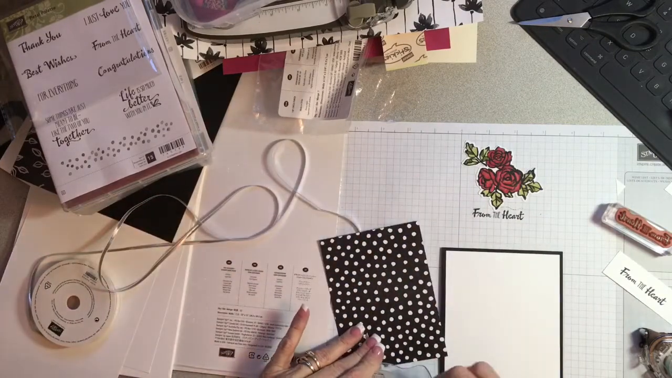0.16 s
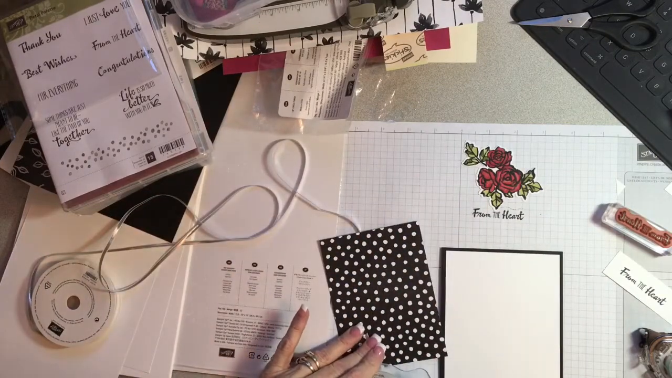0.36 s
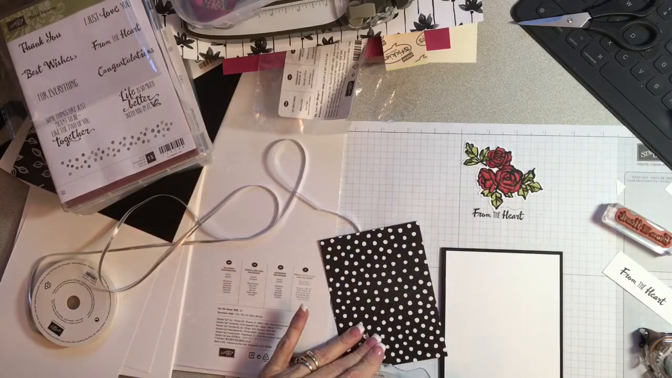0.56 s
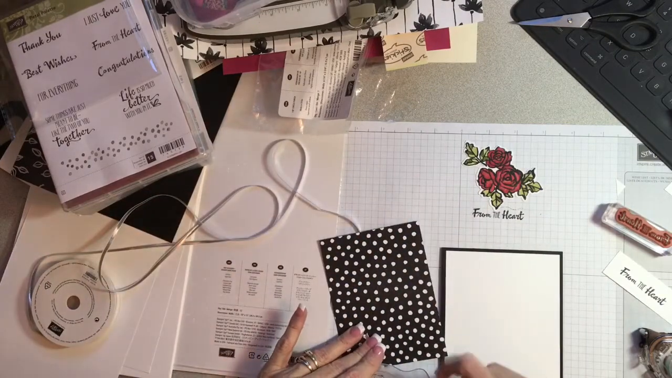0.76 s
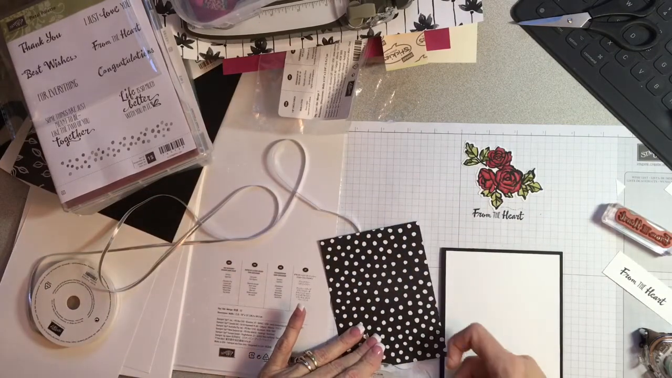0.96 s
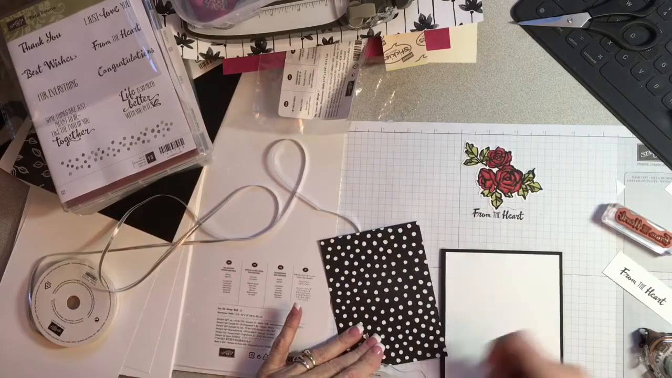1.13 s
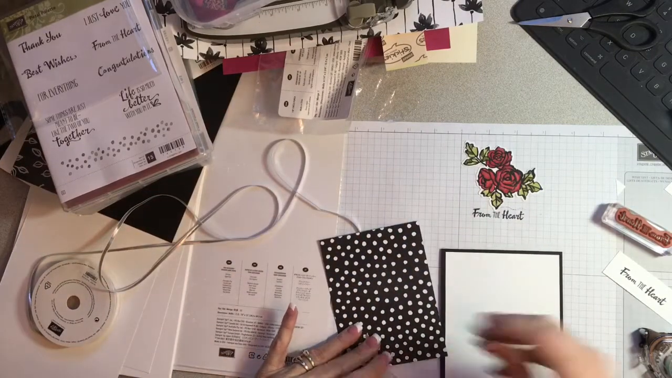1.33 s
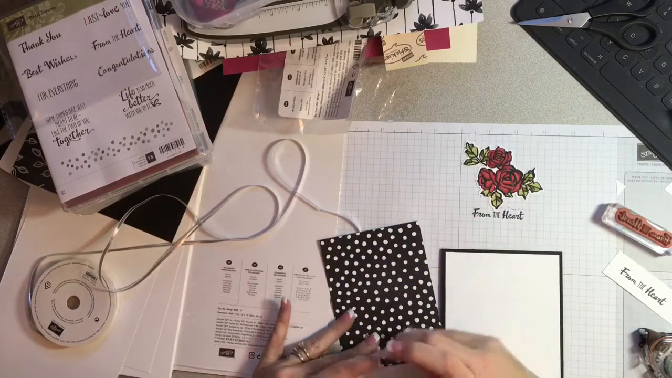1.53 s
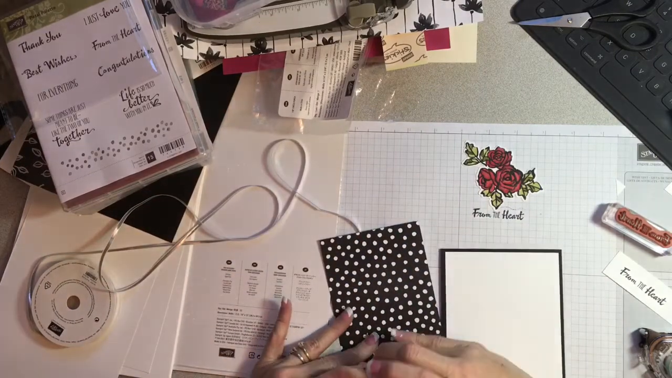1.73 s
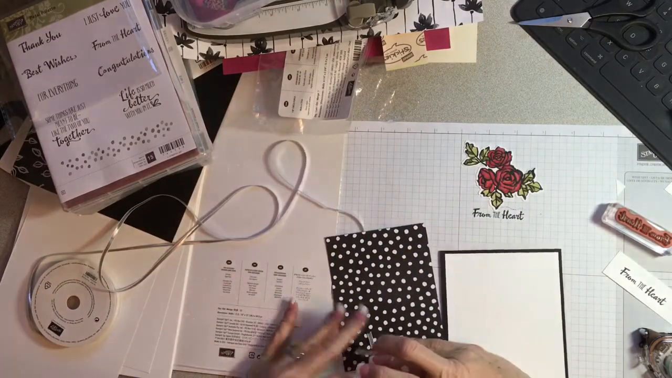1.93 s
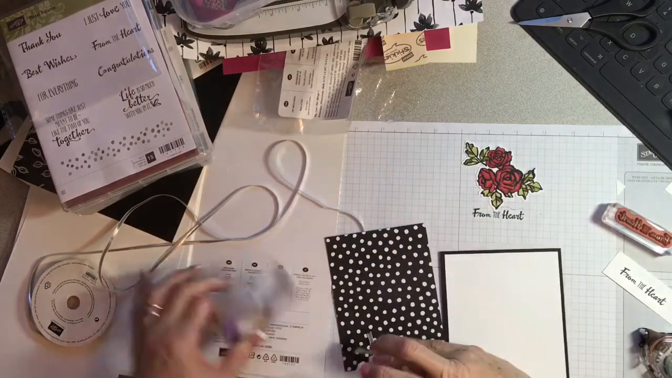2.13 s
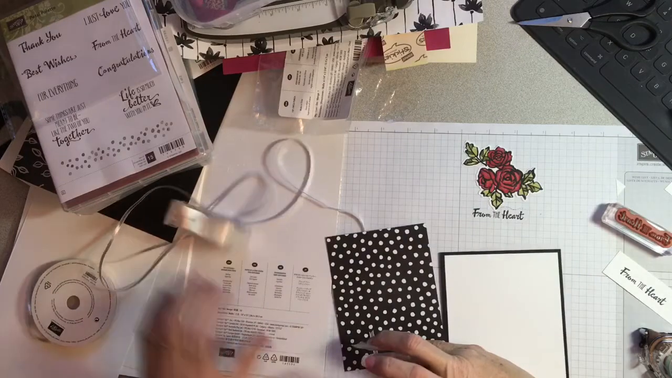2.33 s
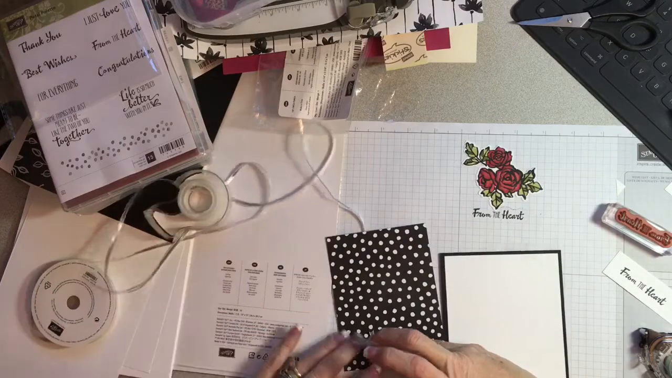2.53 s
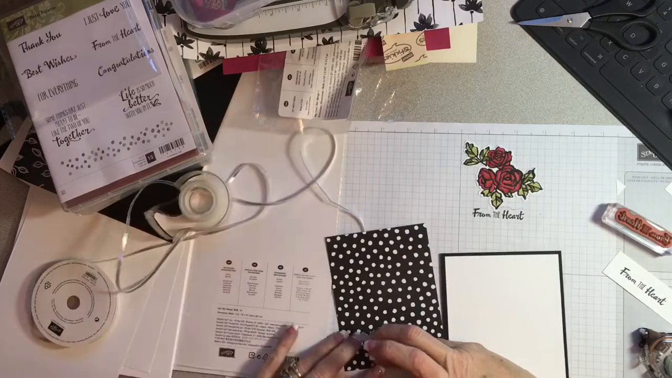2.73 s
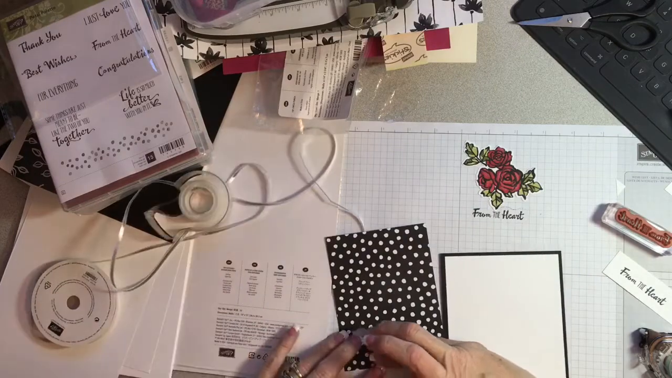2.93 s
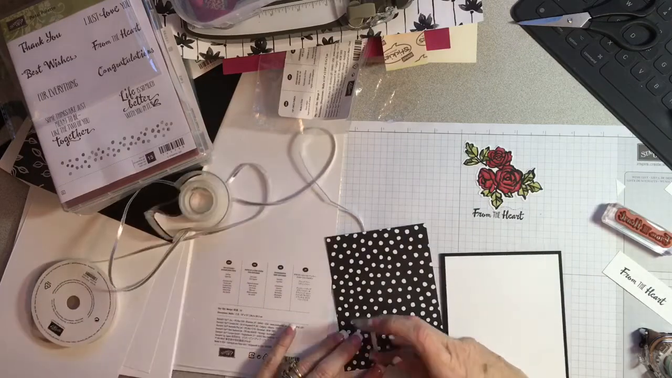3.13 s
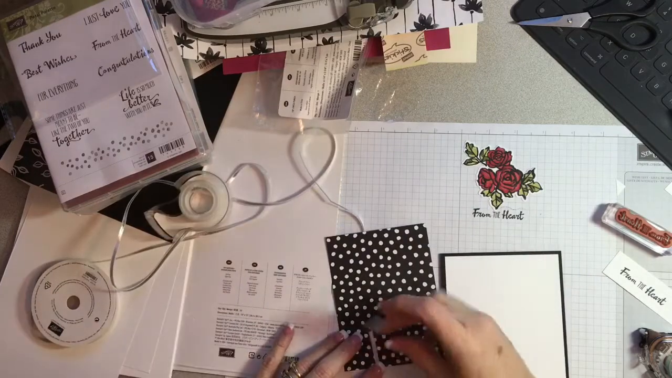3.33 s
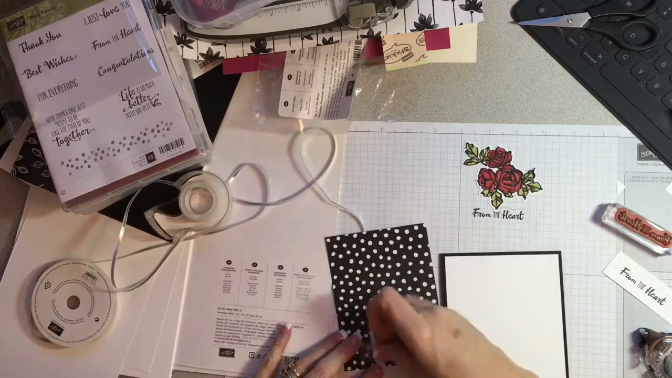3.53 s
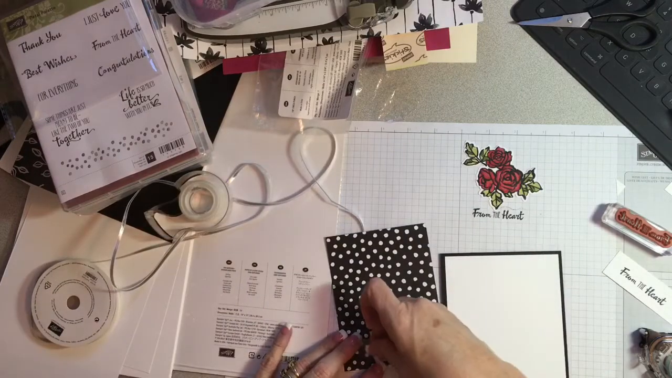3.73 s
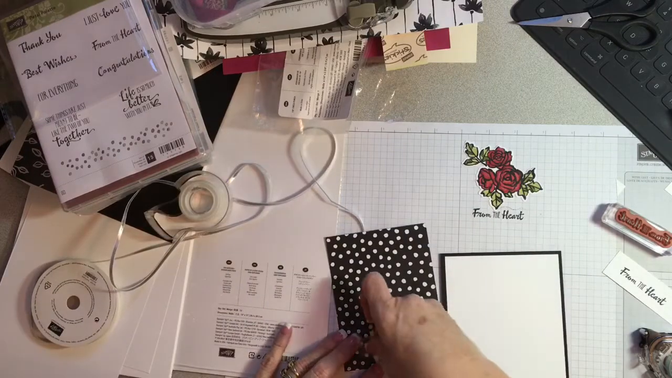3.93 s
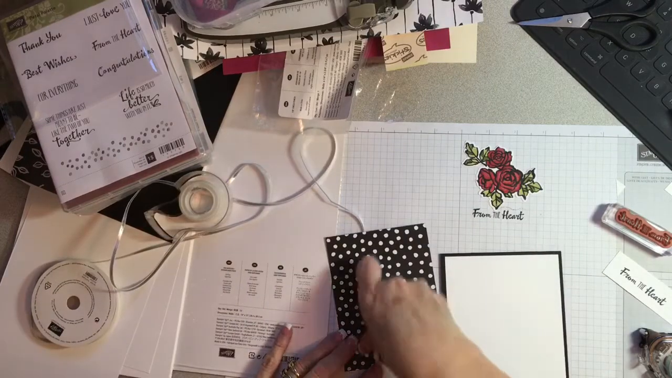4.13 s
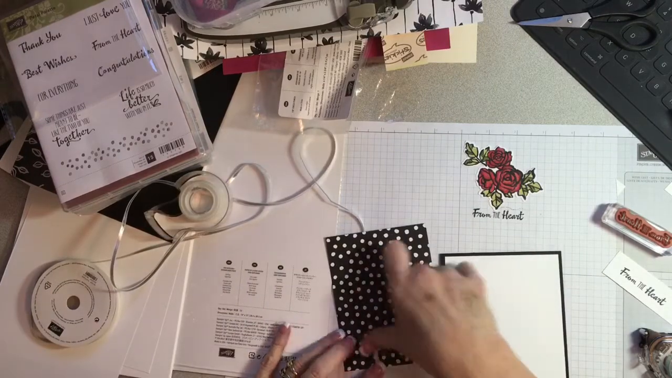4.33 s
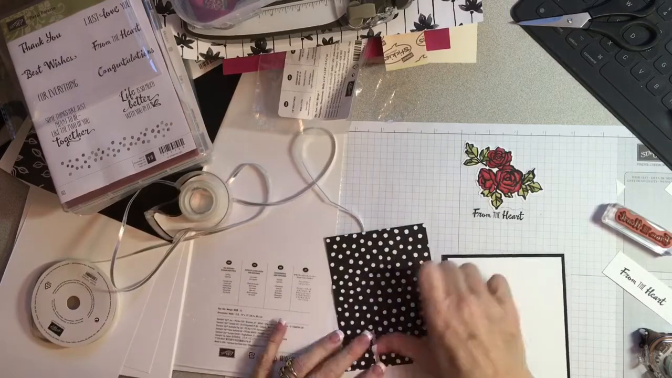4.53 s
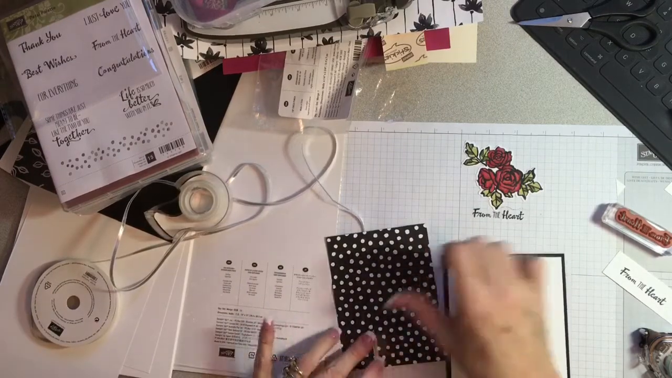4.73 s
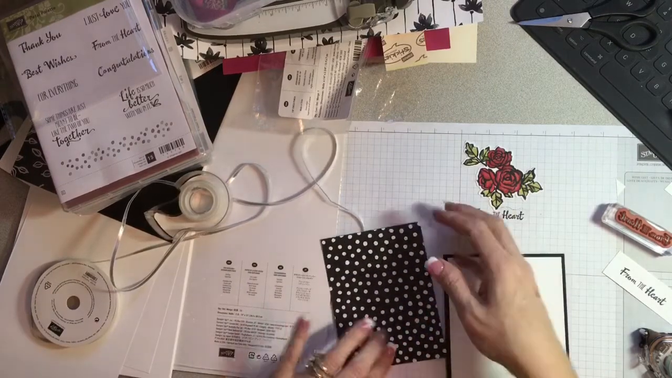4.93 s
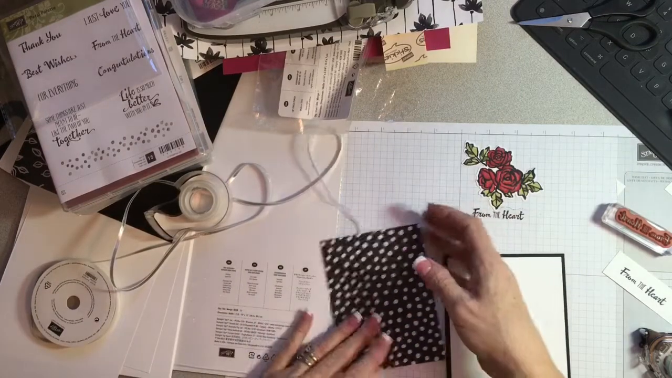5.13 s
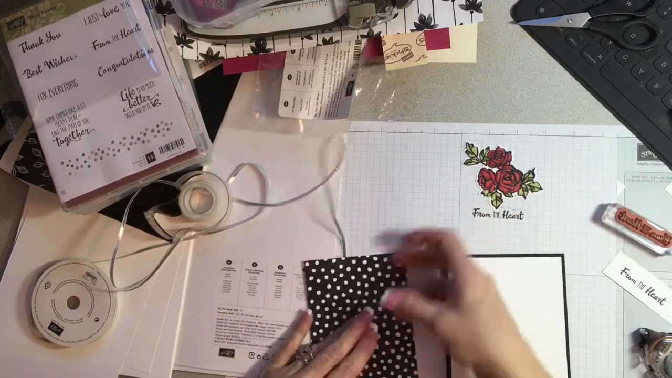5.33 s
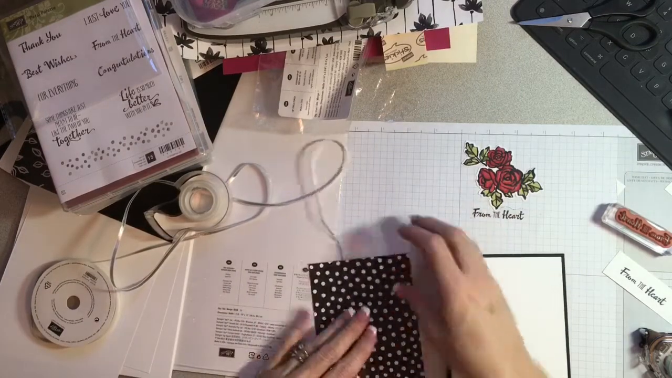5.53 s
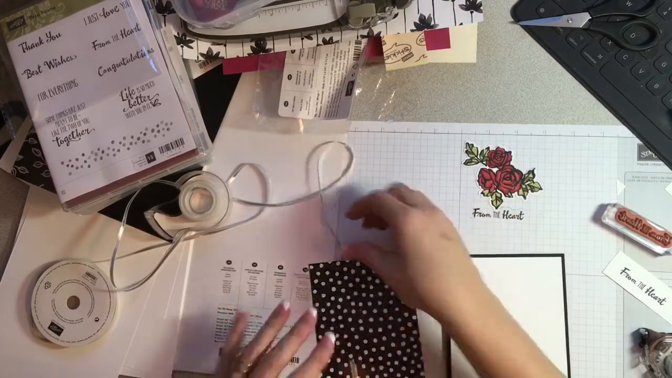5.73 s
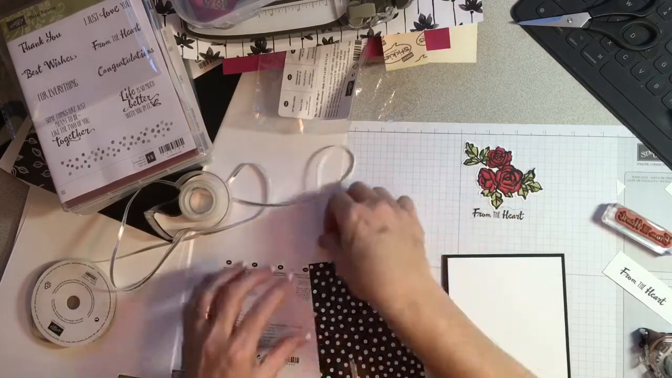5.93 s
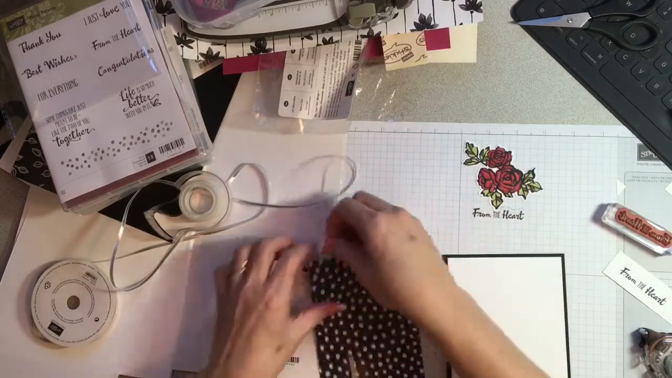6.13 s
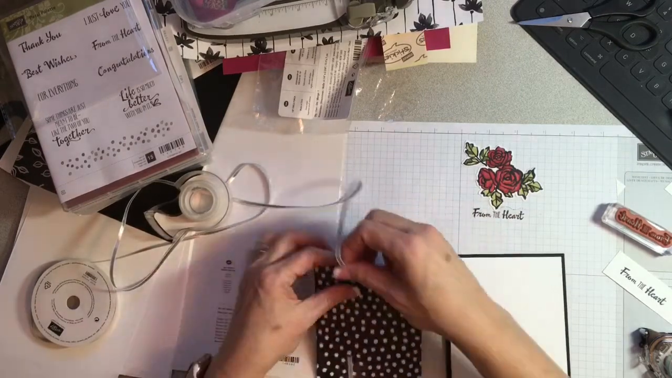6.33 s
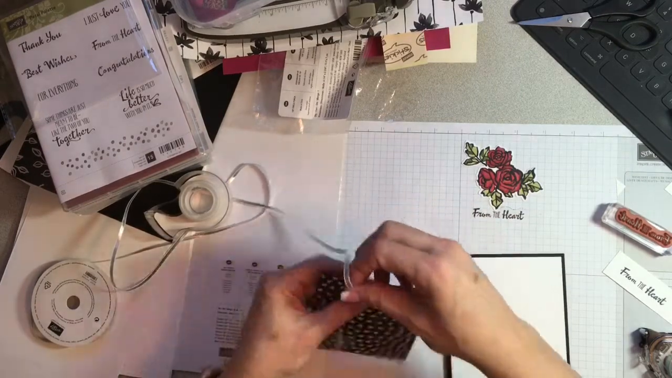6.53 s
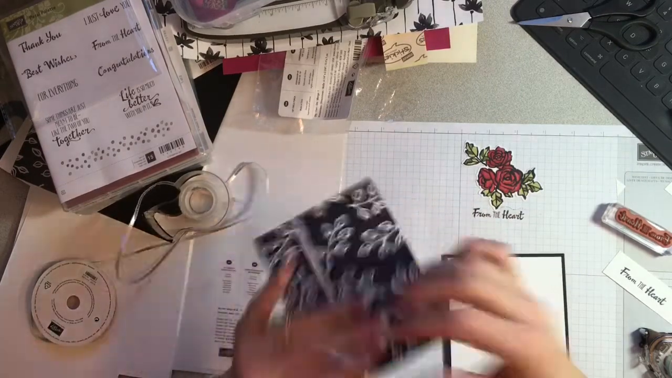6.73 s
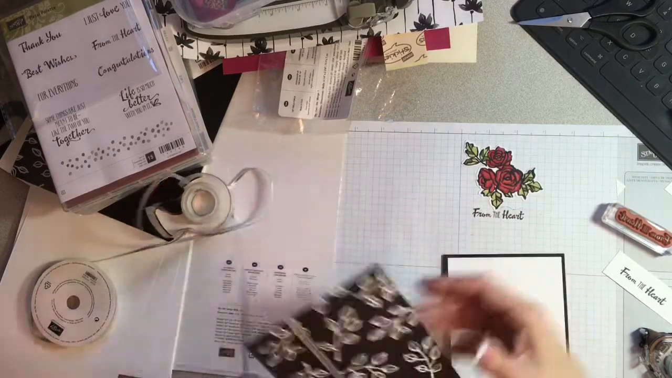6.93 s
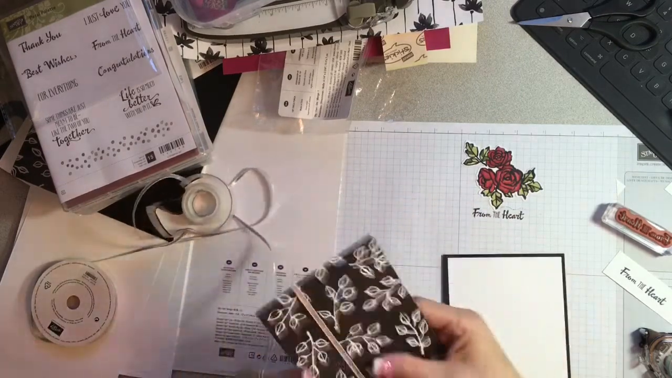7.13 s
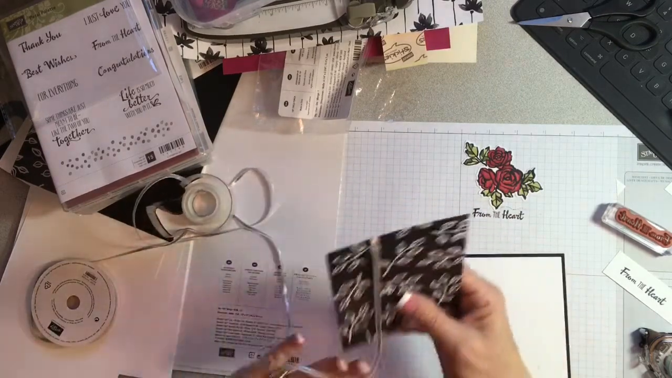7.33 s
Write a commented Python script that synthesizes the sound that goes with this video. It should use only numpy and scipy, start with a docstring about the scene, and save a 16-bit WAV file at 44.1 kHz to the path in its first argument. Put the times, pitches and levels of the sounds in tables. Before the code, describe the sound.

Close-up craft desk sounds: crisp tape cracks, a hollow plastic rattle and knock, soft finger rubs, small desk thumps and a bright card swish.

```python
"""A craft desk in a quiet room, with hands at work: tape snaps off a roll, the plastic dispenser
clatters down, fingers press tape flat and slide and flip stiff card. Strokes are shaped hiss, snaps are
showers of noise grains, knocks add ringing shell modes, and presses boom through decaying desk modes.
A small room answers all but the desk boom and the room tone; close pickup and desk reflection
colour the whole, with dips near 5, 7.8 and 10.4 kHz."""
import sys
import numpy as np
from scipy import signal
from scipy.io import wavfile
from scipy.ndimage import uniform_filter1d

SR = 44100
rng = np.random.default_rng(int(sys.argv[2]) if len(sys.argv) > 2 else 0)


def dump(signal):
    """Clip the signal to [-1, 1] and save it as 16-bit WAV at the path in sys.argv[1]."""
    limited = np.clip(np.atleast_2d(signal).T, -1, 1)
    pcm = np.round(limited * 32767).astype(np.int16)
    wavfile.write(sys.argv[1], SR, pcm)


N = 329868


def gain_of(db):
    """Decibels to amplitude."""
    return 10 ** (np.asarray(db) / 20)


def evened(x):
    """Scales to rms 1."""
    return x / np.sqrt(np.mean(np.abs(x) ** 2) + 1e-20)


def read(points, hz):
    """Reads a spectrum on a log-frequency axis."""
    f, value = np.transpose(points)
    return np.interp(np.log(hz + 1), np.log(f + 1), value)


def curve(points, t):
    """Reads a breakpoint curve at times t."""
    return np.interp(t, *np.transpose(points))


def add(mix, s, sound):
    """Adds a sound at time s."""
    part = mix[round(s * SR):][:len(sound)]
    part += sound[:len(part)]


def band(x, lo_hz, hi_hz):
    """Causal band-pass."""
    sos = signal.butter(2, [lo_hz, min(hi_hz, 20000)], "band", fs=SR, output="sos")
    return signal.sosfilt(sos, x)


def noise(field_db, size=256):
    """Noise whose short-time level follows field_db(hz column, time row)."""
    hop = size // 4
    hz = np.fft.rfftfreq(size, 1 / SR)[:, None]
    t = np.arange(N // hop + 5) * hop / SR
    real, imag = rng.standard_normal((len(t), len(hz), 2)).T
    unit = .6 * np.sqrt(len(hz))  # a flat 0 dB field comes out near rms 1
    frames = (real + 1j * imag) * gain_of(field_db(hz, t)) / unit
    return signal.istft(frames, nperseg=size, noverlap=size - hop)[1][:N]


# Room tone spectrum, lumpy in the lows: f/Hz, level/dB per Hz (shape only)
AIR_SPECTRUM = [(12, -29), (20, -3.5), (59, -9.5), (90, 1.5), (109, -19), (140, -0.5), (191, -4.5),
                (213, -7.5), (534, -14.5), (686, -18), (1100, -16.5), (1450, -17), (2680, -23),
                (3260, -35.5), (15500, -46)]
AIR_DB = -68.5  # rms level


def room_tone():
    """Steady air and electronics noise with a lumpy low end."""
    air = noise(lambda hz, t: read(AIR_SPECTRUM, hz) + 0 * t, size=2048)
    return gain_of(AIR_DB) * evened(air)


# Colour of rubbed surfaces before tilt: f/Hz, level/dB per Hz
RUB_COLOUR = [(1200, -17.5), (2500, -5), (3800, -4), (6500, -4.5), (10000, -7), (14000, 1)]
# Fingers, ribbon and card sliding, one row a stroke:
# peak t/s, length t/s, hiss level/dB, brightness/dB per octave, card body level/dB
STROKES = [(.0064, 0.031, -46.5, 11, -73), (0.055, 0.047, -30.5, 6.5, -59.5), (0.273, 0.075, -59, 11, -82),
           (0.35, .07, -52.5, 8, -83), (0.499, .15, -57, -1.5, -73), (0.583, 0.17, -54.5, 0, -68),
           (1.5, 0.13, -59.5, 6, -94), (1.738, 0.13, -63, -0.5, -85), (1.824, 0.11, -58, 8, -97),
           (1.905, 0.11, -55, 2.5, -91), (1.948, 0.058, -48, 5.5, -88), (3.215, .044, -55, 6, -86.5),
           (3.314, 0.075, -54.5, 3.5, -93), (3.349, 0.021, -54.5, 0, -90), (3.469, 0.062, -66, 10.5, -93),
           (3.691, 0.086, -71.5, -2, -93), (3.913, .09, -58, 4.5, -93), (4.172, 0.25, -49, 4, -91),
           (4.35, 0.07, -62, 6.5, -97), (4.429, 0.098, -56, 5, -93), (4.572, 0.054, -57.5, 0, -84),
           (4.696, 0.14, -58, 4, -86), (4.796, 0.024, -52.5, 5.5, -88), (4.905, 0.03, -38.5, 5.5, -84),
           (4.994, 0.031, -60, 3, -87), (5.075, 0.11, -51, 0.5, -70), (5.172, .2, -54, 1.5, -87),
           (5.244, 0.12, -47, 2, -89), (5.402, 0.019, -57.5, -0.5, -90), (5.518, 0.11, -50.5, 3, -95),
           (6.134, 0.2, -57, 2.5, -97), (6.216, 0.044, -53.5, -0.5, -70), (6.322, .11, -56.5, 1, -68),
           (6.4, 0.16, -54.5, 3, -68.5), (6.487, 0.07, -60, -1, -61.5), (6.556, 0.087, -47, 4, -77),
           (6.594, 0.062, -50, 1, -61.5), (6.708, 0.071, -46.5, 8, -63), (6.762, 0.075, -63, -3, -66.5),
           (6.83, 0.035, -33.5, 20, -71.5), (6.85, 0.13, -45.5, 10, -75), (6.958, 0.17, -60, 15, -94),
           (7.194, 0.068, -55.5, -6, -53.5), (7.269, 0.17, -54, -3, -72), (7.39, 0.25, -67, 0, -74)]
# Faint movement of sleeves and ribbon: t/s, level/dB added to the rub colour
RUSTLE_LEVEL = [(0.0, -57.5), (0.33, -69), (0.83, -62.5), (0.98, -55.5), (1.65, -68.5), (2.15, -63.5),
                (2.25, -57), (2.48, -65.5), (2.73, -70.5), (3.69, -73), (4.16, -69), (4.29, -68.5),
                (4.77, -70.5), (5.25, -70.5), (5.58, -69.5), (6.0, -73.5), (6.33, -59.5), (7.48, -71)]
# Wandering pitch of the card body: t/s, f/Hz
CARD_PITCH = [(0.0, 1360), (1.5, 1450), (1.9, 2400), (4.58, 2264), (4.69, 420), (5.08, 1380), (5.17, 845),
              (5.25, 2740), (6.21, 2560), (6.49, 1300), (6.77, 497), (6.83, 1250), (7.0, 1400), (7.19, 550),
              (7.27, 636), (7.39, 1980)]
SWELL_SHARE = 0.27  # part of a stroke spent swelling


def rubbing():
    """Sliding contact: grainy hiss, tilted for each stroke, over the duller body of the card."""
    peak, length, hiss_db, tilt_db, body_db = np.transpose(STROKES)
    swell, fade = SWELL_SHARE * length, (1 - SWELL_SHARE) * length
    body_hz = curve(CARD_PITCH, peak)

    def field_db(hz, t):
        """Level of strokes and rustle in each band and frame, roughened at random."""
        octaves = np.log2((hz + 300) / 7000)
        hiss = gain_of(read(RUB_COLOUR, hz) + tilt_db * octaves) ** 2
        body = gain_of(-16.5 * np.log2((hz + 30) / body_hz) ** 2) ** 2  # a broad hump
        hiss_power = gain_of(hiss_db) ** 2 * hiss / hiss.mean(0)
        body_power = gain_of(body_db) ** 2 * body / body.mean(0)

        since = t - peak[:, None]
        phase = np.clip(1 + np.minimum(since / swell[:, None], -since / fade[:, None]), 0, 1)
        strokes = (hiss_power + body_power) @ np.sin(np.pi / 2 * phase) ** 4
        rustle = gain_of(read(RUB_COLOUR, hz) + 0.51 * octaves + curve(RUSTLE_LEVEL, t)) ** 2

        patches = rng.standard_normal((len(t), len(hz))).T
        patches = uniform_filter1d(patches, size=6, axis=0)
        patches = evened(uniform_filter1d(patches, size=14, axis=1))
        # grit lifts or dips every band at once; sparse random lifts roughen the hiss
        grit = evened(uniform_filter1d(rng.standard_normal(len(t)), size=3))
        grains = rng.exponential(1, len(t)) * (rng.random(len(t)) < .07)
        roughness_db = 1.54 * patches + 1.8 * grit + 2.2 * np.minimum(grains, 3)
        return 10 * np.log10(strokes + rustle) + roughness_db

    return noise(field_db)


# Small room's decay by band: f/Hz, t60 t/s, level/dB (shape only)
ROOM_DECAY = [(203.4, 1, 1), (700, 0.33, -5), (2070, 0.17, 4.5), (5000, 0.21, -2), (12000, 0.13, 1)]
ROOM_DB = -9.5  # tail energy relative to the direct sound


def room(x):
    """Sparse taps of random sign, each band dying at its own speed."""
    taps = np.zeros(SR // 2)
    at = np.arange(120, len(taps) - 20, 20)
    taps[at + rng.integers(0, 20, len(at))] = rng.choice([-1., 1.], len(at))
    hz, t, frames = signal.stft(taps, SR, nperseg=256)
    decay = np.array(ROOM_DECAY)
    t60 = read(decay[:, [0, 1]], hz)[:, None]
    level_db = read(decay[:, [0, 2]], hz)[:, None]
    tail = signal.istft(frames * gain_of(level_db - 60 * t / t60), SR, nperseg=256)[1]
    return signal.oaconvolve(x, tail / np.linalg.norm(tail))[:N]


def crack(db, body_db, body_hz, edge_db, t60, rise, first_db):
    """One sharp break, then a shower of small ones, split into body, middle and edge bands."""
    t = np.arange(3500) / SR
    grain_db = 2.5 * np.minimum(rng.exponential(1, len(t)), 3)
    grit = rng.standard_normal(len(t)) * gain_of(grain_db)
    shower = grit * (1 - np.exp(-t / rise)) * gain_of(-60 * t / max(t60, .003))
    first_break = gain_of(first_db) * signal.unit_impulse(len(t), 8)
    burst = shower / np.linalg.norm(shower) + first_break

    body = band(burst, body_hz / 1.53, body_hz * 1.537)
    middle = band(burst, 2630, 7480)
    edge = band(band(burst, 12000, 18100), 7100, 19000)
    spread_db = 12.0  # energy of a burst over its peak
    return sum(gain_of(db + part_db + spread_db) * part / np.linalg.norm(part)
               for part_db, part in ((body_db, body), (0, middle), (edge_db, edge)))


# Tape and card snapping: t/s, middle-band peak level/dB (nominal), body f/Hz,
# body level/dB re middle, edge level/dB re middle
SNAPS = [(0.0586, -31, 910, -11.5, -9), (0.0714, -29.5, 2110, -6.5, -27), (0.149, -55, 1660, 3, 0),
         (0.1644, -39.5, 2300, -8, 7), (0.2018, -49, 1570, -20, 20), (0.2061, -34, 1740, -17, 15.5),
         (0.2162, -36.5, 1650, -4, -11), (0.271, -53.5, 2470, 1, 5), (0.358, -35, 1340, -2, 9),
         (0.387, -41.5, 2310, 2, 0), (0.4778, -41.5, 2250, -10, 1), (0.4856, -50, 2290, 8.5, -8),
         (0.583, -49, 2420, -17, 16), (0.6583, -59.5, 526, 12, -8), (0.6994, -47, 1700, 2.5, 12.5),
         (0.748, -44.5, 574, -10, -24), (0.8042, -38.5, 1410, -11, -3), (0.827, -15, 2100, -11, 5),
         (0.9717, -39, 2340, -25, 13), (0.9917, -51, 1810, 5, -14), (1.0051, -29.5, 2300, -4, 7),
         (1.018, -19.5, 2150, -3, 15), (1.0217, -26, 2000, -3, -20), (1.0255, -19, 2090, -2.5, 5.5),
         (1.035, -27, 2100, 6, 17), (1.1185, -33.5, 1300, 6, 10), (1.1572, -28, 1350, -6.5, -0.5),
         (1.3353, -45.5, 1490, 0.5, 2), (1.5168, -49, 1450, -2.5, -21), (3.3535, -42, 1350, -16.5, -7.5),
         (3.7663, -54.5, 530, -25, -8), (3.894, -58, 584, -11, 19), (3.911, -51, 503, -10, -14),
         (4.129, -42, 980, -17, 10), (4.1614, -36, 2300, -37, -10), (4.202, -44, 2280, -18, 0),
         (4.2217, -35.5, 2210, -21, 13), (4.2293, -27.5, 2300, -7, 13.5), (4.247, -41, 970, -5, -24),
         (4.411, -56, 2070, -16, 21.5), (4.464, -49, 608, -16, 3), (4.5244, -37, 1540, -4, 1),
         (4.9231, -29, 920, -12.5, 7.5), (5.0123, -49.5, 2400, -19, -6), (5.0396, -48, 2450, 1.5, -9),
         (5.0992, -32.5, 1460, -8.5, -10), (5.111, -40.5, 504, -7, 15), (5.319, -38.5, 2430, -10, -4),
         (5.3304, -29.5, 1360, -6.5, 3), (5.9595, -66.5, 1480, -11.5, 31.5), (6.0004, -45.5, 1230, 2, 0),
         (6.1987, -45, 2420, -19, -12), (6.5852, -53, 1280, 1, -15), (6.7084, -53.5, 900, 11, -5),
         (7.0244, -50.5, 1220, -8, -4), (7.17, -42.5, 525, -6, -4), (7.1935, -46.5, 650, 9.5, 5),
         (7.2133, -39.5, 1200, 0, 4), (7.2548, -50.5, 514, 12.5, 2), (7.2692, -43.5, 583, 5.5, -3)]
SNAP_T60_S = 0.037  # decay of the shower of small breaks


def snaps():
    """Glue letting go and card buckling: each release is a crack with its own body and edge."""
    out = np.zeros(N)
    for s, db, body_hz, body_db, edge_db in SNAPS:
        add(out, s, crack(db, body_db, body_hz, edge_db, SNAP_T60_S, rise=.0001, first_db=-1))
    return out


# Weight landing on the desk top: t/s, level/dB before the soft onset,
# hardness/dB (tilt per two octaves), slap level/dB re ring peak
THUMPS = [(0.062, -40, 2, -10.5), (0.352, -42, -11.5, -23), (0.826, -51, -13, 7), (1.027, -34.5, 2, -6),
          (1.152, -42.5, -4.5, -15.5), (2.241, -33, 0.5, -5.5), (2.568, -42.5, 3, 5.5),
          (4.13, -50, -20, -15), (4.226, -47.5, -12.5, -5), (4.524, -45, -7, -12), (4.682, -47, 3, -11.5),
          (4.92, -30.5, 4, -12), (5.096, -34.5, -6, -26), (5.114, -41, -11, -5), (5.327, -55.5, -11, -14),
          (6.588, -51, -1, -2), (7.184, -54, 1, 7.5), (7.261, -64, 0, 16)]
# Desk top modes: f/Hz, level/dB, t60 t/s
DESK_MODES = [(53.5, -5, 0.35), (85.7, -3, 0.34), (140.3, 2.5, 0.37), (233.2, 1.5, 0.18),
              (291, -8.5, 0.057), (399.3, -5, 0.17), (673, -16.5, .1)]


def desk():
    """A soft push rings the desk top; harder contact wakes its upper modes; a flat hand adds a slap."""
    out, t = np.zeros(N), np.arange(SR // 2) / SR
    onset = 1 - np.exp(-t / 0.0072)
    for s, db, hard_db, slap_db in THUMPS:
        spot_db = 1.5 * rng.standard_normal(len(DESK_MODES))  # mode balance varies with each landing
        ring = np.zeros(len(t))
        for (hz, mode_db, t60), offset_db in zip(DESK_MODES, spot_db):
            level_db = mode_db + offset_db + hard_db * np.log2(hz / 86) / 2
            ring += gain_of(level_db - 60 * t / t60) * np.sin(2 * np.pi * hz * t)
        slap = evened(band(rng.standard_normal(len(t)), 88, 700)) * gain_of(slap_db - 60 * t / 0.13)
        add(out, s, gain_of(db) * (ring / abs(ring).max() + slap) * onset)
    return out


# Plastic shell modes: f/Hz, bandwidth f/Hz, level/dB
SHELL_MODES = [(1226, 65, -4), (1345, 16, -10), (1852, 16, -6), (2300, 110, -6), (2500, 45, -2),
               (3000, 45, -4), (3548, 38, -1), (4062, 45, -1), (5900, 60, -7), (6400, 70, -9),
               (7440, 40, -8), (7600, 70, -8), (9480, 90, -14), (12500, 250, -8)]


def shell_ring(strike_db):
    """The shell modes after one tap: decaying sines, each offset by its strike level."""
    t = np.arange(5000) / SR
    ring = np.zeros(len(t))
    for (hz, width, mode_db), offset_db in zip(SHELL_MODES, strike_db):
        decay = np.exp(-np.pi * width * t)
        ring += gain_of(mode_db + offset_db) * decay * np.sin(2 * np.pi * (hz * t + rng.random()))
    return ring * (1 - np.exp(-t / 0.0019))


# Dispenser knocking on the desk and its roll knocking in the shell: t/s, middle-band peak
# level/dB (nominal), struck part f/Hz, ring level/dB re middle, edge level/dB re middle
KNOCKS = [(2.0946, -30.5, 4400, -19.5, 3), (2.098, -32, 1850, -7, 8.5), (2.1074, -34.5, 3320, -9, -26),
          (2.1143, -36, 1850, -0.5, 11.5), (2.173, -28.5, 2280, 1.5, -14.5), (2.1842, -37, 2780, -5, -25),
          (2.203, -35.5, 2630, -1, -9), (2.2298, -52.5, 5950, -12, -2), (2.2434, -18, 1160, -1, 7.5),
          (2.2484, -29, 1800, -6, -9), (2.2559, -26, 3520, -1, -17.5), (2.2776, -23.5, 3500, -6, -6),
          (2.2935, -23.5, 2520, -5.5, 9.5), (2.3007, -23, 3550, -1, -29), (2.3287, -27.5, 2500, -6, -5),
          (2.3431, -22, 6340, 1.5, 10.5), (2.3487, -16, 4200, -9, -13), (2.5238, -40, 3570, -13.5, -14),
          (2.5658, -15.5, 6840, -18.5, 9), (2.5734, -22, 3560, -5.5, -4.5),
          (2.5989, -21.5, 3070, -10, 14.5), (2.6173, -24, 1350, -11.5, 5), (2.63, -26, 6230, -28, 3.5),
          (2.6392, -31, 3020, -12, 14.5), (2.6563, -30, 3580, -11, 13)]
# Loose roll chattering between knocks, two passages: t/s, level/dB
RATTLE_LEVELS = [
    [(2.085, -77), (2.145, -58), (2.265, -43.5), (2.373, -38.5), (2.42, -58.5)],
    [(2.5, -74.5), (2.538, -51.5), (2.65, -49.5), (2.72, -61.5)],
]
KNOCK_T60_S, KNOCK_BODY_HZ, KNOCK_BODY_DB = .036, 772, -11  # body level is relative to the middle band


def dispenser():
    """Each knock rings the shell modes near the part struck; the loose roll chatters in many small taps."""
    out, modes_hz = np.zeros(N), np.transpose(SHELL_MODES)[0]
    for s, db, struck_hz, ring_db, edge_db in KNOCKS:
        reach_db = -32 * abs(np.log2(modes_hz / struck_hz))  # falls per octave away from the struck part
        reach_db = reach_db + 2.5 * rng.standard_normal(len(SHELL_MODES))
        add(out, s, crack(db, KNOCK_BODY_DB, KNOCK_BODY_HZ, edge_db, KNOCK_T60_S, rise=.0012, first_db=-8))
        add(out, s, gain_of(db + ring_db) * shell_ring(np.maximum(reach_db, -14.5)))

    t = np.arange(N) / SR
    level = sum(gain_of(np.interp(t, *np.transpose(passage), left=-200, right=-200))
                for passage in RATTLE_LEVELS)
    tap_db = 3.8 * np.minimum(rng.exponential(1, N), 3)
    taps = rng.standard_normal(N) * gain_of(tap_db)
    taps = taps * (rng.random(N) < 2000 / SR)  # about 2000 taps a second
    ringing = signal.oaconvolve(taps, shell_ring(np.zeros(len(SHELL_MODES))))[:N]
    chatter = evened(band(taps, 1400, 17000)) + .45 * evened(ringing)
    return out + level * evened(chatter)


def scene():
    """Near sources and their room tail, with the desk boom and room tone left dry."""
    near = snaps() + dispenser() + rubbing()
    return (near + gain_of(ROOM_DB) * room(near) + desk() + room_tone())[None]


# Overall colour of near pickup and desk reflection, with dips near 5, 7.8 and 10.4 kHz: f/Hz, level/dB
OVERALL_COLOUR = [(100, 2.5), (3800, 2.5), (4500, 0), (5000, -3), (5600, 1.5), (6800, 1), (7800, -1.5),
                  (9300, 2.5), (10400, -2.5), (11300, -0.5), (15000, -6)]
EDGE_HZ = 15850  # upper band limit


def record(dry):
    """Colour of near pickup and desk reflection as a minimum-phase (causal) filter, then the band limit."""
    hz = abs(np.fft.fftfreq(2048, 1 / SR))
    log_gain = np.log(gain_of(read(OVERALL_COLOUR, hz)))
    phase = -signal.hilbert(log_gain).imag
    colour = np.fft.ifft(np.exp(log_gain + 1j * phase)).real[:512]
    coloured = signal.oaconvolve(dry, colour[None])[:, :N]
    low_pass = signal.firwin(511, EDGE_HZ, window=("kaiser", 9), fs=SR)
    return signal.oaconvolve(coloured, low_pass[None], "same")


dry = scene()
out = record(dry)
dump(out)
```